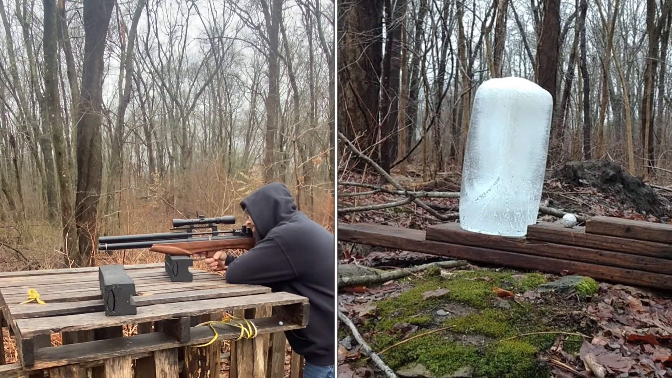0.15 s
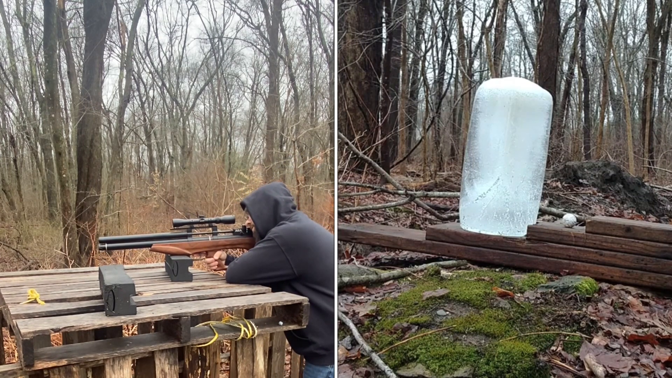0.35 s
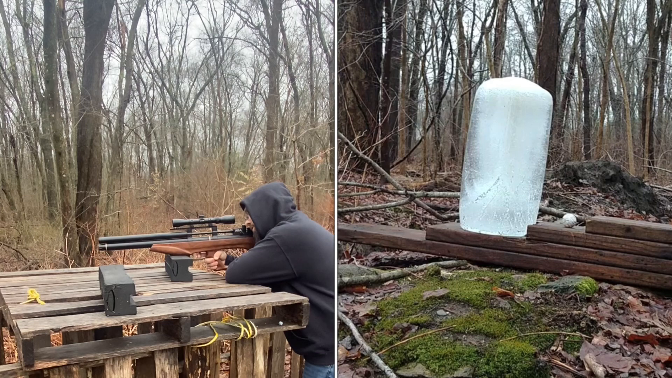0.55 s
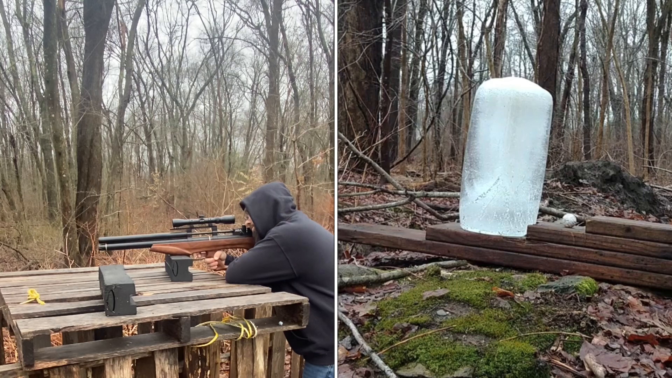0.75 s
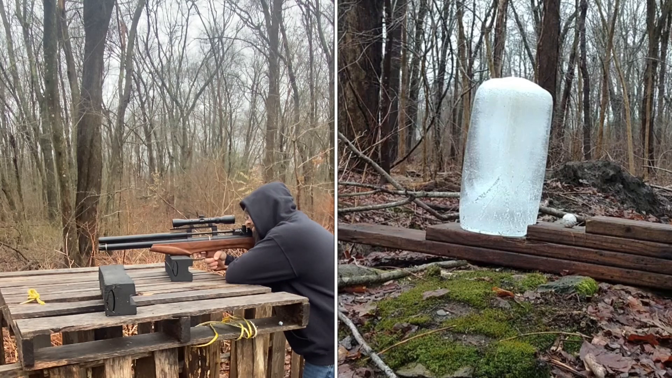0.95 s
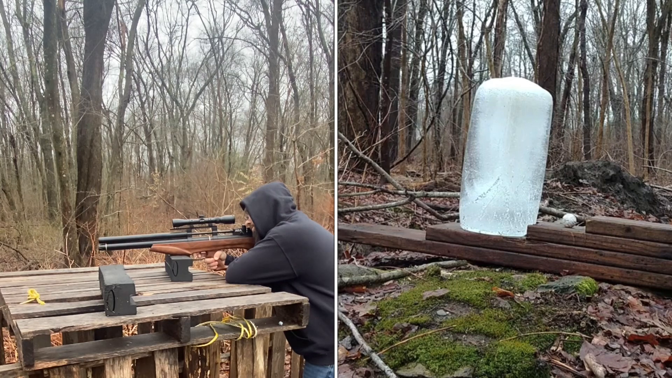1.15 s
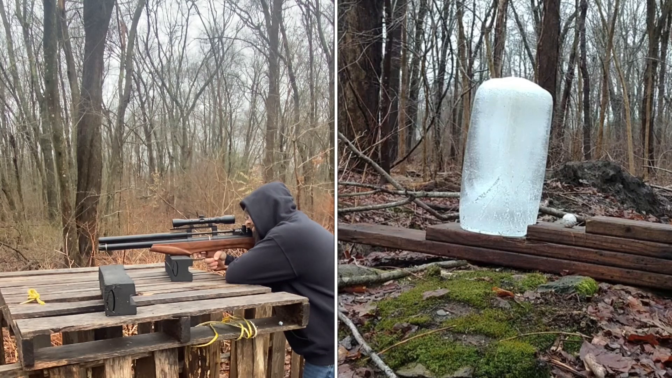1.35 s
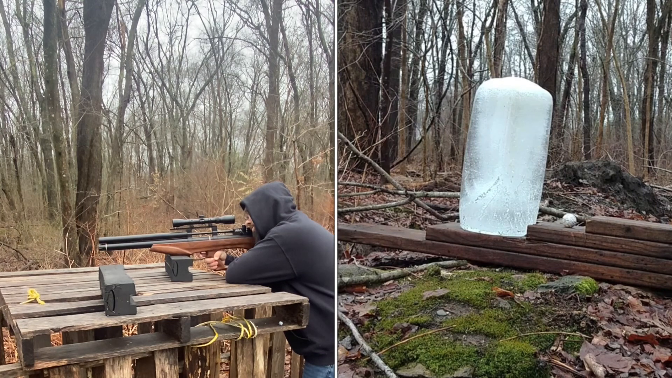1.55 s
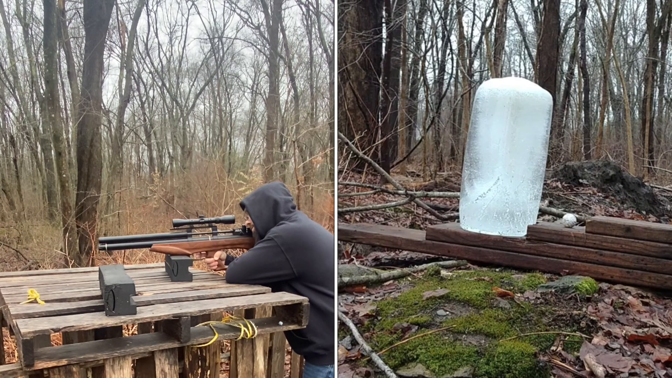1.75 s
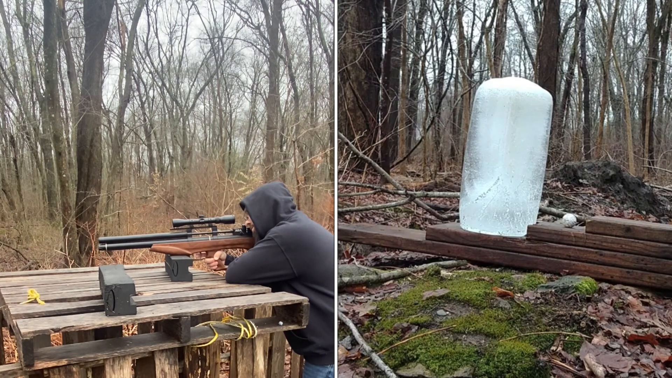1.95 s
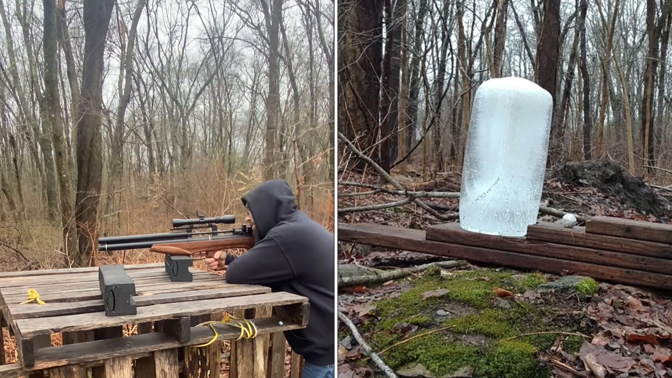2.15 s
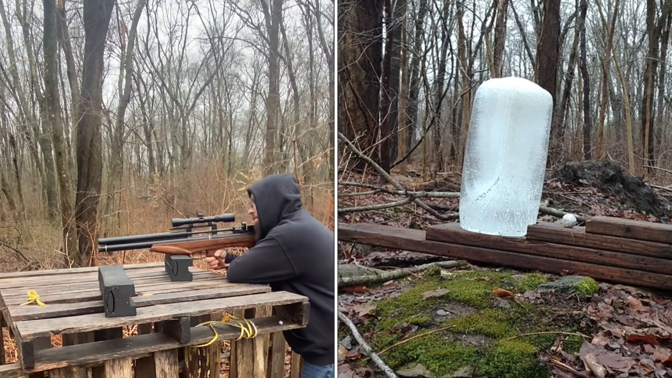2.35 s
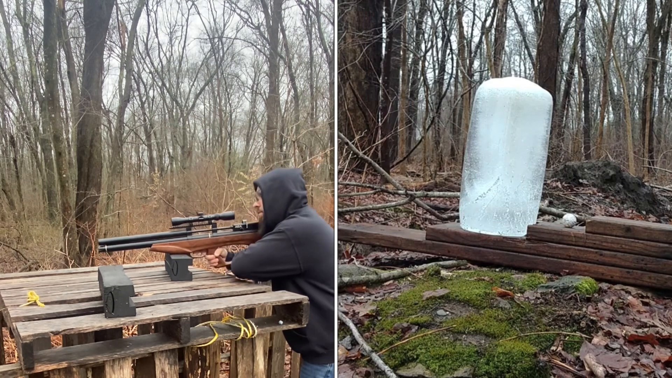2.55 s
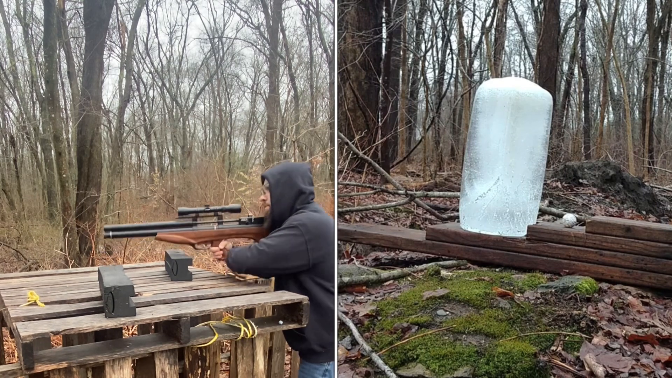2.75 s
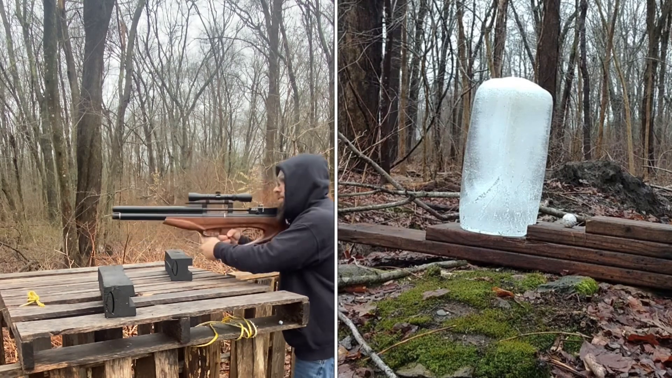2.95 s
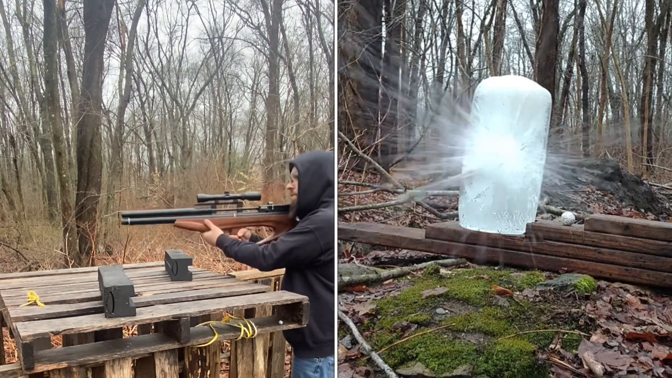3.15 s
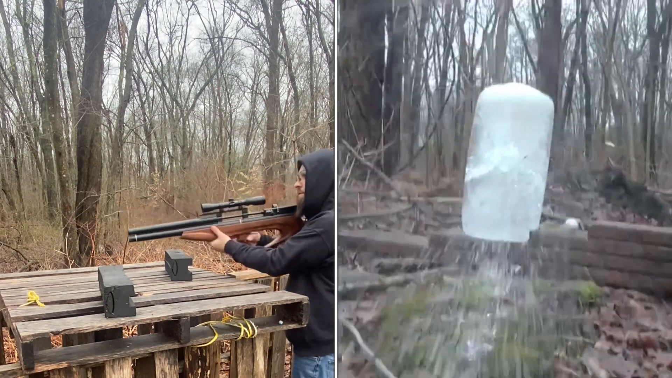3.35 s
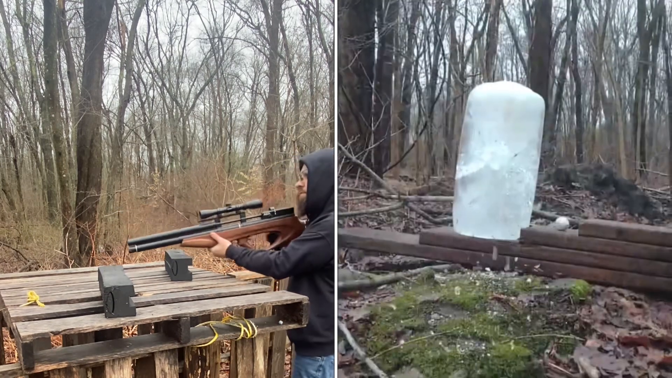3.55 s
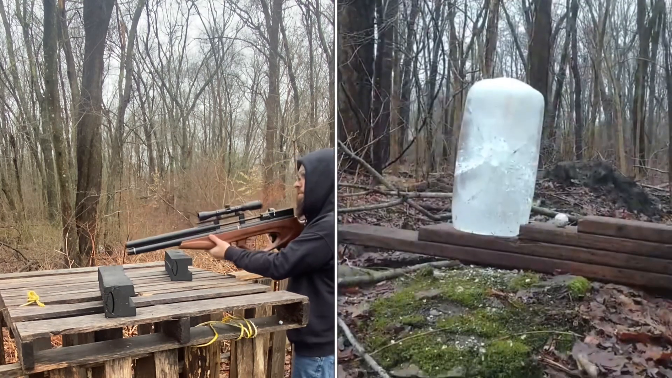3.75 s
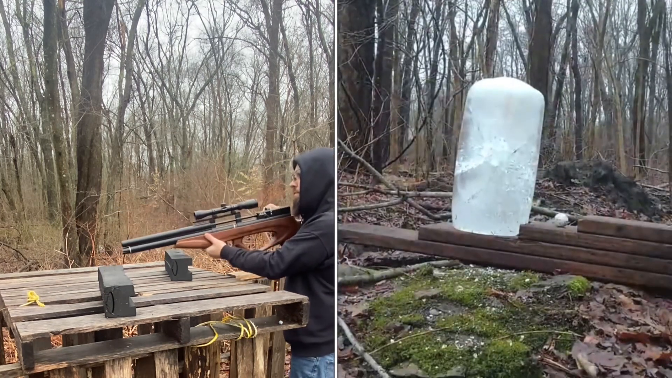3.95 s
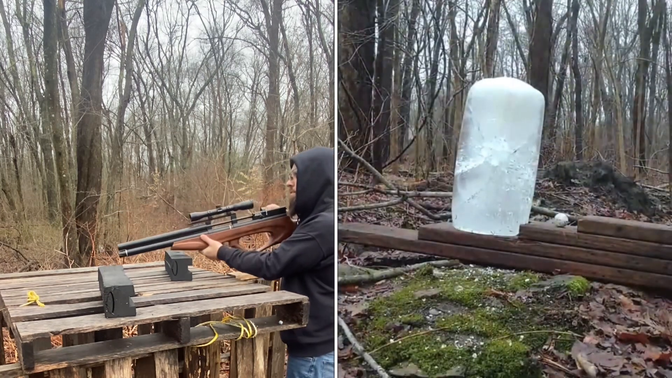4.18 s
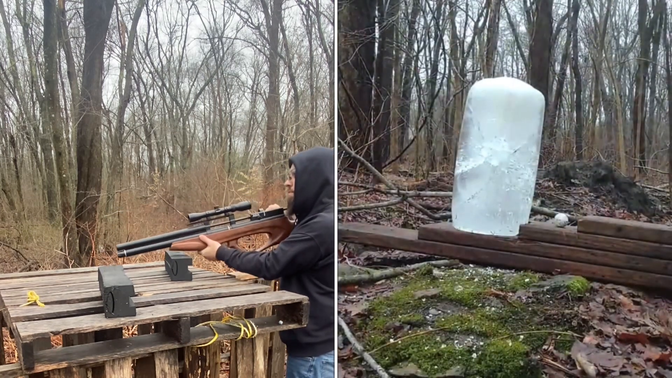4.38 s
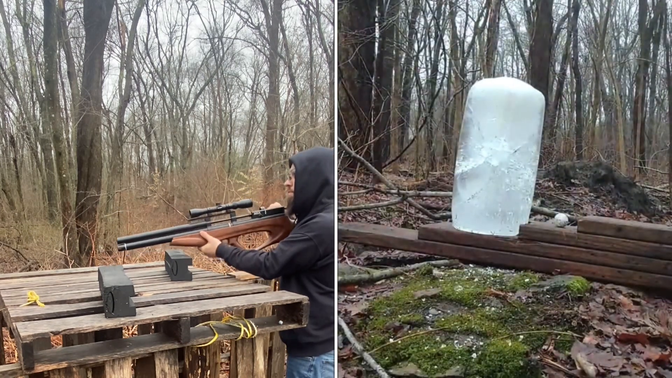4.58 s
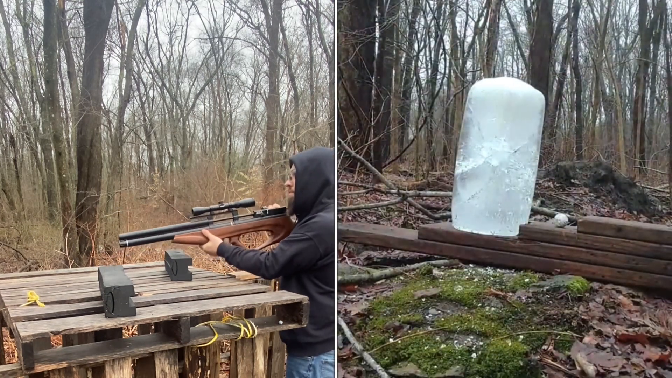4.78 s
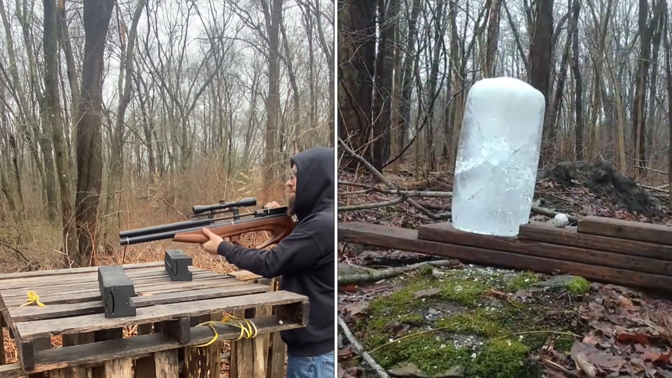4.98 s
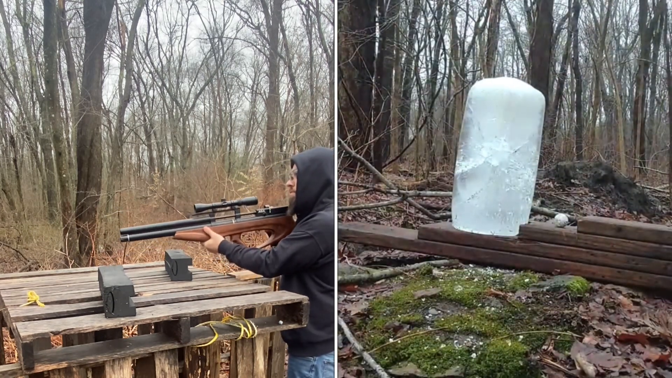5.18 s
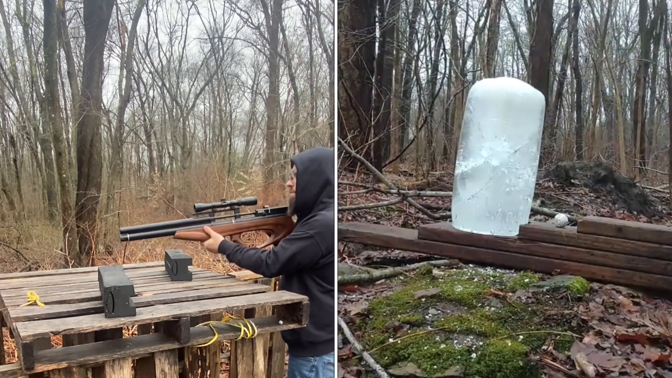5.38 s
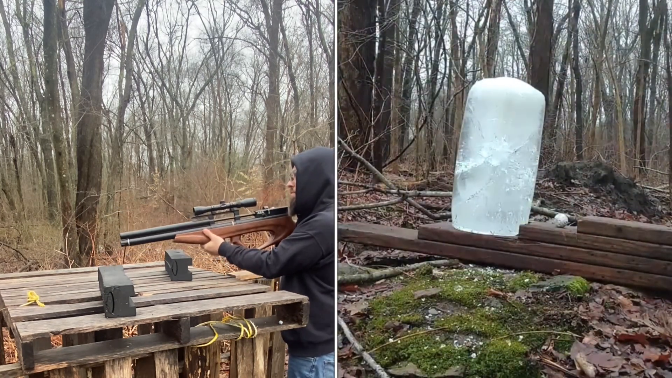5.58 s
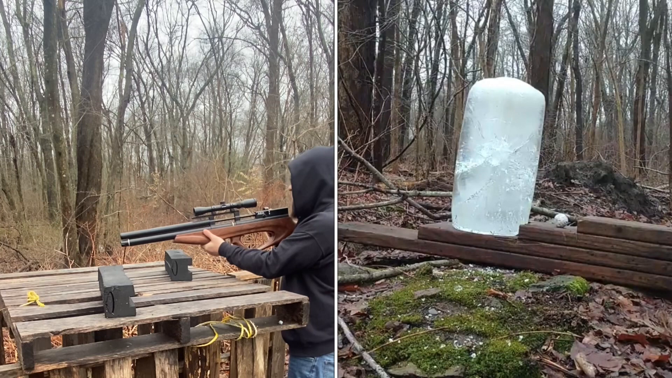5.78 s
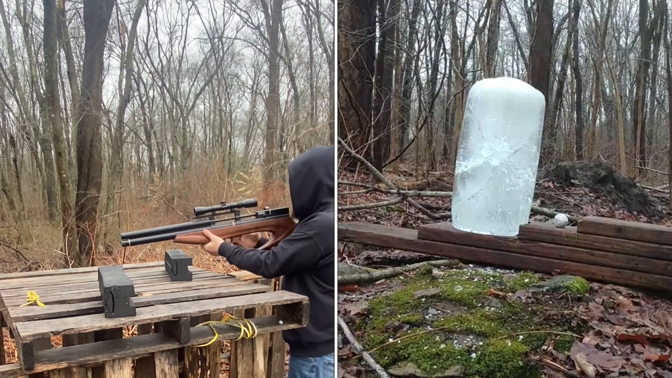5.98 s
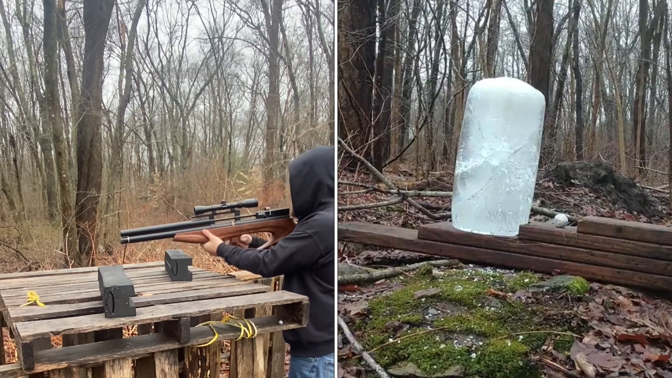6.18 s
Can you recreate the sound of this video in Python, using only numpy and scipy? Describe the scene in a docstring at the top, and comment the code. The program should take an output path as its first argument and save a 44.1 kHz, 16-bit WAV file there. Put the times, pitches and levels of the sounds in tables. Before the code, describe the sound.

A sharp air rifle shot echoes through trees, followed by a close crackle of shattering ice and metallic bolt clicks.

```python
"""A wood, with a road droning in the distance. An air rifle is fired at a block of ice: steel parts knock
and ring, air rushes from the muzzle, the pellet snaps on the ice and the trees throw back an echo, all
heard by a microphone pair at the bench. A second pair beside the ice, mixed in later, hears the block ping
and is showered with chips and dust. Then the bolt is worked, scraping and clacking, and something softly
rustles."""
import sys
import numpy as np
from scipy import signal
from scipy.io import wavfile
from scipy.ndimage import uniform_filter1d

SR = 44100
rng = np.random.default_rng(int(sys.argv[2]) if len(sys.argv) > 2 else 0)


def unload_audio(sound):
    """Save the sound as a 16-bit wav file, at the path given as the first command line argument."""
    columns = np.transpose(np.atleast_2d(sound))
    # keep every value between -1 and 1, then stretch to whole-number steps
    steps = np.round(np.clip(columns, -1, 1) * 32767)
    wavfile.write(sys.argv[1], SR, steps.astype(np.int16))


N = 274474


def amp(db):
    return 10 ** (np.asarray(db) / 20)


def unit_rms(x):
    return x / np.sqrt(np.mean(x ** 2) + 1e-20)


def peak_rms(x):
    """Level of the loudest 30 samples of a stereo sound."""
    return np.sqrt(np.max(uniform_filter1d((x ** 2).mean(0), 30)))


def curve_at(points, hz):
    """Value of a curve drawn over log frequency."""
    freqs, values = np.transpose(points)
    return np.interp(np.log(hz + 1), np.log(freqs + 1), values)


def add(mix, start_s, sound, lean_db=0):
    """Mixes in a mono or stereo sound; lean is left over right."""
    part = mix[:, round(start_s * SR):][:, :sound.shape[-1]]
    part += (amp([[lean_db / 2], [-lean_db / 2]]) * sound)[:, :part.shape[1]]


def band(x, lo_hz, hi_hz):
    return signal.sosfilt(signal.butter(2, [lo_hz, hi_hz], "band", fs=SR, output="sos"), x)


def ring(x, hz, width_hz):
    """One resonance of gain 1."""
    pole = np.exp((2j * np.pi * hz - np.pi * width_hz) / SR)
    return 2 * signal.lfilter([1 - abs(pole)], [1, -pole], x).real


def modes(x, table, eq=((1, 0),)):
    """A body of several resonances; neighbours swing in opposite sense."""
    return sum((-1) ** k * amp(db + curve_at(eq, hz)) * ring(x, hz, width)
               for k, (hz, width, db) in enumerate(table))


def noise(tone, likeness, lean, patchy_db, size=1024, span=(0, N / SR)):
    """Stereo noise shaped by tone, left-right likeness and lean curves, inside a span of seconds."""
    first, last = round(span[0] * SR), round(span[1] * SR)
    hz = np.fft.rfftfreq(size, 1 / SR)
    a, b, c, d, patches = rng.standard_normal((4 * (last - first) // size + 5, len(hz), 5)).T
    patches = unit_rms(uniform_filter1d(uniform_filter1d(patches, 8, 0), 12, 1))  # drifting colour
    alike = np.clip(curve_at(likeness, hz), -1, 1)[:, None]
    left = a + 1j * b
    right = alike * left + np.sqrt(1 - alike ** 2) * (c + 1j * d)
    tone_db = curve_at(tone, hz) + np.array([[.5], [-.5]]) * curve_at(lean, hz)
    spectra = np.array([left, right]) * amp(tone_db[..., None] + patchy_db * patches)
    sound = signal.istft(spectra, nperseg=size, noverlap=size - size // 4)[1]
    return np.pad(unit_rms(sound[:, :last - first]), [(0, 0), (first, N - last)])


def fader(rows):
    """Gain along a level curve, silent outside it."""
    times, db = np.transpose(rows)
    return amp(np.interp(np.arange(N) / SR, times, db, -150, -150))


def swells(rows):
    """Gain of swells that climb 30 dB in their rise time and drop 30 dB in their fall time."""
    t = np.arange(N) / SR
    power = sum(amp(2 * (db - 30 * np.maximum((peak_s - t) / rise, (t - peak_s) / fall)))
                for peak_s, db, rise, fall in rows)
    return np.sqrt(power)


# Stereo width of the background. Each row: frequency in Hz, left-right correlation.
BED_LIKENESS = [(60, 0.91), (120, 0.88), (240, 0.69), (480, 0.46), (950, 0.25), (1890, -0.21),
                (3770, -0.12), (7520, 0.0069), (15000, -0.06)]
# Balance at the bench. Each row: frequency in Hz, left over right in dB.
BENCH_LEAN = [(60, -2), (110, 1.5), (200, 0), (380, 1.5), (700, 3), (1290, -0.5), (2380, -0.5),
              (4400, -0.5), (8120, 0), (15000, 12.5)]
# Level of the road noise, which dips after the ice shower and slowly recovers.
# Each row: time in seconds, tyre level in dB.
ROAD_FADER = [(0.0, -42), (0.47, -42.5), (0.75, -44), (1.55, -44.5), (1.7, -42), (2.1, -42.5), (2.65, -45),
              (3.1, -43), (3.4, -49.5), (3.9, -49), (4.2, -47.5), (5.04, -47), (5.5, -44), (6.22, -39)]
# Colours of the road's three layers. Each row: frequency in Hz, relative level in dB.
ENGINE_TONE = [(12, -51), (20, -30), (36, -2.5), (54, 1), (65, 2), (87, -5), (119, -6.5), (145, -14.5),
               (177, -12), (285, -23.5), (400, -24), (520, -47.5), (880, -120)]
TYRE_TONE = [(120, -46), (200, -14.5), (365, -13), (702, -7), (889, -3), (1380, -9), (2170, -19.5),
             (2600, -23.5), (3380, -48), (5720, -120)]
FAR_HISS_TONE = [(1060, -13.5), (1800, 3.5), (2170, -13.5), (2730, 1.5), (3300, -2), (4210, -10),
                 (5470, -13), (9000, -42.5), (11700, -67), (19800, -120)]


def road():
    """Tyres roar near 1 kHz; the engines' low throb and a thin hiss follow their level in part."""
    roar = fader(ROAD_FADER)
    ride = roar / amp(-45)
    engines = amp(-45) * ride ** 0.27 * noise(ENGINE_TONE, BED_LIKENESS, BENCH_LEAN, 0.82, size=4096)
    tyres = roar * noise(TYRE_TONE, BED_LIKENESS, BENCH_LEAN, 1.5)
    hiss = amp(-56.5) * ride ** 0.45 * noise(FAR_HISS_TONE, BED_LIKENESS, BENCH_LEAN, 1.3)
    return engines + tyres + hiss


# Colour of the finest hiss. Each row: frequency in Hz, relative level in dB.
FINE_HISS_TONE = [(4120, -31), (7000, 0.5), (7990, 3.5), (8630, -20.5), (10300, -3.5), (12200, 0.5),
                  (15000, -1), (16100, -8)]
# The noise floor. Each row: time in seconds, level in dB.
MIC_HISS_FADER = [(0.0, -70.5), (1.4, -72), (1.6, -75), (1.9, -72), (3.1, -73), (4.2, -74.5), (5.0, -78.5),
                  (5.5, -74), (6.22, -68)]


def microphone_hiss():
    """The microphones lay a faint, bright hiss under everything."""
    return fader(MIC_HISS_FADER) * noise(FINE_HISS_TONE, BED_LIKENESS, BENCH_LEAN, .7)


# The ring of the rifle's steel. Each row: pitch in Hz, bandwidth in Hz, gain in dB.
STEEL_MODES = [(1554, 160, 6.5), (2230, 280, 3.5), (2644, 170, 3), (3190, 350, -1), (3680, 370, -1),
               (4100, 570, -0.5), (4730, 430, -0.5), (5950, 1300, -3), (6500, 580, 3), (7500, 680, 7),
               (8340, 500, 5), (9330, 430, -9)]


def steel(contact, part_hz, low_db, high_db):
    """Contact shakes the rifle's resonances, most those of the part that is struck."""
    eq = [(2400, low_db), (4000, 0.0059), (5000, 0.011), (7000, high_db)]
    woken = [(hz, width, db + 8 * np.exp(-((hz - part_hz) / 450) ** 2)) for hz, width, db in STEEL_MODES]
    direct, *scattered = band(band(modes(contact, woken, eq), 1450, 12000), 1300, 14000)
    # The right microphone hears it two samples late; each side gets its own scatter.
    return np.array([direct, np.roll(direct, 2)]) + .25 * np.array(scattered)


# How far a blow wakes the low and the high resonances. Each row: struck part's pitch in Hz, gain in dB.
LOW_WAKE = [(2500, -2.5), (4000, -7), (4800, -11), (8000, -8)]
HIGH_WAKE = [(2500, -12.5), (4000, -17.5), (4800, -20.5), (8000, -4)]
# Clicks and clacks of the action. Each row: start in seconds, level in dB, struck part's pitch in Hz,
# spread to the other parts in dB, left over right in dB.
STEEL_KNOCKS = [(0.1975, -33, 2230, 0, -0.3), (1.4238, -10, 4650, 8, 10), (1.428, -1.5, 3000, -7, -5),
                (1.431, -7.5, 8350, 4, 4.5), (1.435, -11, 4800, -7, 13), (1.4462, -14, 7900, 0, 0),
                (1.461, -12.5, 4820, 3, 4), (3.874, -22, 2480, 0.5, -4), (4.1313, -24, 3930, -3, -3.5),
                (4.2598, -24.5, 7300, -5, 0), (4.2724, -23, 3750, -3, -7), (4.295, -33, 2430, -3, -5),
                (4.3056, -16, 3860, 1, -6), (4.3137, -22.5, 2060, 13, -8), (4.3167, -17, 3650, 0, 2),
                (4.322, -29, 3620, 7, 12), (4.34, -23, 2780, -2, 0), (4.551, -25.5, 3960, 9, -3),
                (4.6093, -35, 4460, -4, -5), (4.7674, -33.5, 3800, 1, -4), (4.867, -32, 3660, -1.5, -5),
                (4.887, -25, 3000, 5, -3), (4.896, -24.5, 2630, 0, -2), (5.0417, -6, 2660, 5.5, -2)]


def knocks():
    """Hammer, valve and bolt strike steel: each a clean blow and a dying rattle."""
    out, t = np.zeros((2, N)), np.arange(2600) / SR
    rattle_t60_s = 0.019
    for start_s, db, part_hz, spread_db, lean_db in STEEL_KNOCKS:
        contact = rng.standard_normal((3, len(t))) * amp(-60 * t / rattle_t60_s) * np.minimum(t / 0.00065, 1)
        contact[0, :3] += 4.1 * np.array([.5, 1, .5])  # the clean blow
        low_db = curve_at(LOW_WAKE, part_hz) + spread_db
        high_db = curve_at(HIGH_WAKE, part_hz) + spread_db
        body = steel(contact, part_hz, low_db, high_db)
        add(out, start_s, amp(db) * body / (2 * peak_rms(body)), lean_db)
    return out


def nearby_scatter(x):
    """Nearby trunks and the bench scatter a short, duller tail of sparse taps."""
    t, t60_s = np.arange(9000) / SR, 0.23
    taps = rng.choice([-1., 1.], (2, len(t))) * (rng.random((2, len(t))) < .06)
    tail = band(taps * amp(-60 * t / t60_s) * np.minimum(t / .006, 1), 800, 4600)
    return signal.fftconvolve(x, tail / np.linalg.norm(tail[0]), axes=1)[:, :N]


# Grit around the clacks. Each row: peak time in seconds, relative level in dB, rise and fall in seconds.
GRIT_SWELLS = [(1.429, -16, 0.018, 0.0027), (3.874, -40, 0.019, .03), (4.133, -33, 0.015, 0.019),
               (4.261, -39, 0.032, 0.07), (4.317, -25, 0.037, 0.056), (4.894, -41.5, 0.037, .043),
               (5.042, -29, 0.021, 0.026)]


def metal_grit():
    """Short swells of gritty metallic noise around the clacks; the bolt scrapes between 4.1 and 4.9 s."""
    grains = rng.standard_normal((3, N)) * uniform_filter1d(rng.exponential(1, N), 40) ** 3
    grit = unit_rms(steel(grains, part_hz=3700, low_db=-3, high_db=-13))
    return swells(GRIT_SWELLS) * grit * amp([[-5], [-1]])


def rifle_action():
    """The steel and its scatter; little of their top octave reaches the bench microphones."""
    metal = metal_grit() + knocks()
    metal += amp(-17.5) * nearby_scatter(metal)
    return signal.sosfilt(signal.butter(6, 10500, fs=SR, output="sos"), metal)


# Colour of the air burst. Each row: frequency in Hz, relative level in dB.
BLAST_TONE = [(300, -23), (900, -12), (1830, -9), (3000, -7), (4820, -5.5), (6590, -13.5), (9590, -16),
              (11800, -46), (13000, -49.5), (15000, -39.5), (16300, -47)]


def muzzle_blast(start_s=1.428, level_db=-16, t60_s=0.24):
    """Air rushes from the muzzle with a sharp attack and a quick decay."""
    t = np.maximum(np.arange(N) / SR - start_s, 0)
    rush = noise(BLAST_TONE, [(300, .3), (3000, .1), (9000, -.4)], BENCH_LEAN, 3, size=128, span=(1.4, 2))
    return amp(level_db - 60 * t / t60_s) * np.minimum(t / 0.00249, 1) * rush


# Low thuds. Each row: start in seconds, level in dB, pitch in Hz, 60 dB decay in seconds.
LOW_THUMPS = [(1.433, -19.5, 170, 0.026), (2.38, -36, 130, .08)]


def thumps():
    """The recoil thuds into the bench; a soft, dull bump comes later."""
    out, t = np.zeros((2, N)), np.arange(4000) / SR
    for start_s, db, hz, t60 in LOW_THUMPS:
        add(out, start_s, amp(db - 60 * t / t60) * np.sin(2 * np.pi * hz * t))
    return out


# The ice from the bench, lowest ring first. Each row: pitch in Hz, bandwidth in Hz, gain in dB.
FAR_ICE_MODES = [(562, 120, 0), (1750, 680, 3), (2280, 720, 3), (3850, 800, -6), (4600, 600, -6),
                 (6500, 820, -9.5)]
# The hit and two returns. Each row: start in seconds, snap peak in dB, low ring peak in dB,
# left over right in dB.
FAR_IMPACTS = [(1.5054, -5, -22.5, 3.5), (1.5160, -15.5, -39, 2), (1.5298, -16, -41, -4)]


def pellet_far():
    """The pellet lands off to the left: a dry snap with the block's low ring behind it."""
    out, samples = np.zeros((2, N)), np.arange(1500)
    lowest, upper = FAR_ICE_MODES[:1], FAR_ICE_MODES[1:]
    for start_s, snap_db, low_db, lean_db in FAR_IMPACTS:
        tap = (samples == 0) + 0.085 * rng.standard_normal(len(samples)) * np.exp(-samples / 60)
        tap = np.convolve(tap, np.hanning(9))  # distance rounds the edge
        snap = -band(modes(tap, upper), 1300, 7500)
        low = modes(modes(tap, lowest), lowest)  # builds up slowly
        hit = amp(snap_db) * snap / abs(snap).max() + amp(low_db) * low / abs(low).max()
        add(out, start_s, np.array([hit, np.roll(hit, 8)]), lean_db)
    return out


# Shape of the echo. Each row: time in seconds, level in dB.
ECHO_FADER = [(1.53, -39), (1.586, -42), (1.72, -38.5), (1.872, -48), (2.238, -66), (2.5, -74)]
# Its colour. Each row: frequency in Hz, relative level in dB.
ECHO_COLOUR = [(530, -35), (900, -13), (1850, -5), (2020, -6), (3150, -9), (3950, -8), (5260, -16.5),
               (7140, -14.5), (9500, -37.5), (12400, -80), (20900, -120)]


def tree_echo():
    """The shot returns from the trees as a wide wash of noise."""
    likeness = [(900, .2), (3000, -.4), (9000, -.3)]
    return fader(ECHO_FADER) * noise(ECHO_COLOUR, likeness, BENCH_LEAN, 1.5, size=512, span=(1.4, 2.6))


# Dust flying, then settling. Each row: peak time in seconds, level in dB, rise and fall in seconds.
DUST_PUFFS = [(3.182, -22.5, 0.0091, 0.041), (3.197, -27, .01, 0.018), (3.243, -38.5, 0.052, 0.058),
              (3.273, -37, .02, .12), (3.308, -30.5, 0.052, 0.096), (3.35, -49, .05, 0.032),
              (3.43, -53.5, 0.12, 0.24), (3.66, -54, 1, .6)]
DUST_SETTLING = [(3.3, -59.5, 0.27, 0.36), (3.75, -65.5, 0.76, 1.7)]
# Colour of the puffs. Each row: frequency in Hz, relative level in dB.
DUST_TONE = [(180, -23.5), (300, 4.5), (1060, -11), (1600, -3.5), (2200, -16), (3000, -2.5), (3900, -6.5),
             (4300, -15), (5100, -5), (7260, -11), (9330, -22.5), (14000, -12), (15900, -18), (16500, -39)]
# Balance beside the ice. Each row: frequency in Hz, left over right in dB.
ICE_LEAN = [(1000, -1), (8100, 0), (15000, 11)]


def ice_dust():
    """Ice dust flies in puffs and lands in clumps; the finest comes down as a high hiss."""
    likeness = [(300, .2), (9000, 0)]
    clumps = unit_rms(amp(9.3 * uniform_filter1d(rng.exponential(1, N), 30)))
    dust = noise(DUST_TONE, likeness, ICE_LEAN, 2, size=256, span=(3.1, 4))
    finest = noise(FINE_HISS_TONE, likeness, ICE_LEAN, 2, size=256, span=(3.1, 4.6))
    return swells(DUST_PUFFS) * dust * clumps + swells(DUST_SETTLING) * finest


def membrane_push(ms, together):
    """A chip shoves the microphone membranes, which swing back slowly."""
    swing_hz, swing_decay_ms = 138, 2.03
    push_ms = 0.77 + 0.31 * together  # a chip from the side pushes more briefly
    after_ms = np.maximum(ms - 0.57 * push_ms, 0)
    swing = 0.86 * np.exp(-after_ms / swing_decay_ms) * np.sin(2 * np.pi * swing_hz * after_ms / 1000)
    shove = swing - np.sin(np.pi * np.minimum(ms / push_ms, 1)) ** 2
    left = np.interp(ms - 0.5 * (together < -.5), ms, shove)  # a chip from the right gets here late
    right = np.clip(1.1 * together, -1, 1) * shove
    return np.array([left, right])


# Ice cracking up close. Each row: pitch in Hz, bandwidth in Hz, gain in dB.
CHIP_MODES = [(1230, 360, 1.5), (2750, 1660, -5), (3470, 650, -1), (5300, 520, -9.5), (7450, 990, -10)]
# The shower. Each row: start in seconds, relative levels of crack, push and fizz in dB,
# membranes moving together (1) or opposed (-1), left over right in dB.
CHIP_HITS = [(3.1773, -5.5, -25, -17, 1.0, 7), (3.1789, -3.5, -19, -15, 0.53, -3),
             (3.1971, -15, -12, -22, -0.3, 2), (3.2032, -26, -22, -30, -0.58, 6),
             (3.2314, -34, -19.5, -29, 0.6, -4), (3.2358, -13.5, -15, -26, -0.26, 0),
             (3.2444, -14.5, -13.5, -20, -0.46, 0), (3.2548, -25, -29, -29, -0.6, -6),
             (3.2694, -16, -15, -15, -0.91, 2), (3.2747, -27, -26, -28, -0.66, -17),
             (3.2788, -18, -20, -23, -0.45, 3), (3.2859, -17, -14, -20, -0.12, 0),
             (3.2892, -15.5, -37, -21, -0.6, 7), (3.3069, -15, -19.5, -17, 0.71, -4),
             (3.3113, -11.5, -17, -23, -0.73, 1), (3.3247, -36, -38, -26, -0.46, 8),
             (3.329, -23, -16.5, -33, -0.52, 1), (3.336, -32, -27, -37, -0.24, -2),
             (3.356, -19, -6.5, -33, -0.61, -3.5), (3.3747, -44, -40, -45, -0.5, 0),
             (3.383, -34, -43, -39, -0.37, 6), (3.397, -41, -46, -42, -0.1, -2),
             (3.414, -44, -48, -45, 0.0, -7), (3.4397, -32, -30, -58, -0.37, -9),
             (3.542, -47, -42.5, -39, 0.7, -2)]


def ice_chips(decay_ms=0.79):
    """Chips hit the near microphones, each with a crack, a low push and a fizz on top."""
    out, ms = np.zeros((2, N)), np.arange(1300) / SR * 1000
    for start_s, crack_db, push_db, fizz_db, together, lean_db in CHIP_HITS:
        grit = rng.standard_normal((2, 2, len(ms))) * np.exp(-ms / decay_ms) * np.minimum(ms / 0.11, 1)
        grit[0, :, 4] += 3  # the first fracture
        crack = modes(grit[0], CHIP_MODES)
        crack *= amp(crack_db - 9) / peak_rms(crack)
        push = amp(push_db + 2) * membrane_push(ms, together)
        fizz = amp(fizz_db + 4.5) * band(grit[1], 11100, 14600) * [[1.3], [.35]]
        add(out, start_s, crack + push + fizz, lean_db)
    return out


# The block's ping. Each row: pitch in Hz, relative level in dB, 60 dB decay in seconds.
BLOCK_PARTIALS = [(727, -11, 0.0099), (1244, -2, 0.0068), (2820, -15, 0.014), (3800, -16.5, 0.0119),
                  (5030, -9, 0.013), (8070, -19.5, 0.0098)]
# The pellet, then a duller blow. Each row: start in seconds, gain in dB, roll-off in dB per octave.
BLOCK_BLOWS = [(3.1786, -1, -0.5), (3.1961, 4.5, 5)]


def pellet_near():
    """Heard up close, the block pings briefly when struck."""
    out, t = np.zeros((2, N)), np.arange(900) / SR
    attack = np.minimum(t / 0.00074, 1)
    for start_s, blow_db, roll_off in BLOCK_BLOWS:
        for hz, db, t60 in BLOCK_PARTIALS:
            level_db = blow_db + db - roll_off * np.log2(hz / BLOCK_PARTIALS[0][0])
            add(out, start_s, attack * amp(level_db - 60 * t / t60) * np.sin(2 * np.pi * hz * t))
    return out


# The closing rustle. Each row: peak time in seconds, level in dB, rise and fall in seconds.
RUSTLE_SWELLS = [(5.88, -65, .1, 0.98), (6.056, -43.5, .015, .12)]
# Its colour. Each row: frequency in Hz, relative level in dB.
RUSTLE_COLOUR = [(1180, -47), (2000, -18), (3740, -6), (4450, -15), (4940, 0.5), (6200, -15), (7640, -14),
                 (9170, -38), (11700, -19), (16000, -30)]


def rustle():
    """A brief soft hiss, perhaps leaves, brightest near 5 kHz."""
    hiss = noise(RUSTLE_COLOUR, [(2000, .2), (9000, 0)], BENCH_LEAN, 2, size=256, span=(5.8, N / SR))
    return swells(RUSTLE_SWELLS) * hiss


def scene():
    background = road() + microphone_hiss()
    at_bench = rifle_action() + muzzle_blast() + thumps() + pellet_far() + tree_echo()
    at_ice = ice_dust() + ice_chips() + pellet_near()
    return background + at_bench + at_ice + rustle()


def record(dry):
    """A 40 Hz low cut, clipping at full scale, then a 16.6 kHz band limit."""
    low_cut = signal.butter(3, 40, "high", fs=SR, output="sos")
    clipped = np.clip(signal.sosfilt(low_cut, dry), -1, 1)
    band_limit = signal.firwin(511, 16600, window=("kaiser", 9), fs=SR)
    return np.clip(signal.oaconvolve(clipped, band_limit[None], "same"), -1, 1)


dry = scene()
out = record(dry)
unload_audio(out)
```